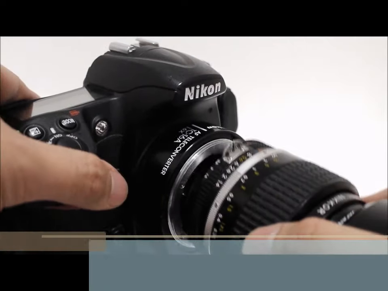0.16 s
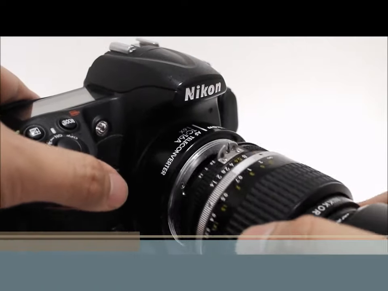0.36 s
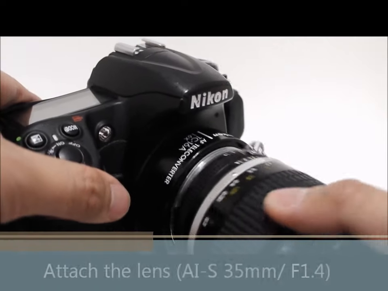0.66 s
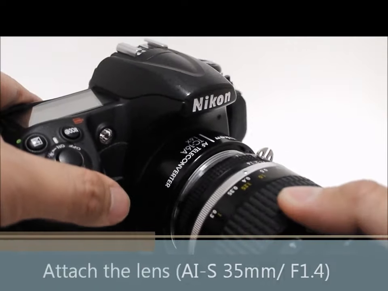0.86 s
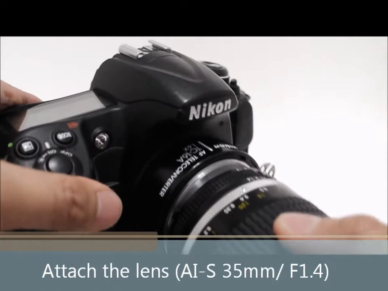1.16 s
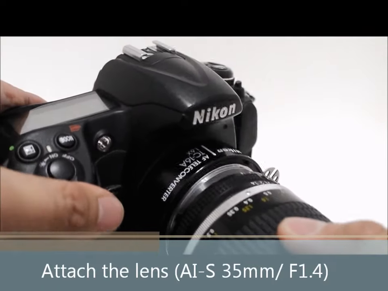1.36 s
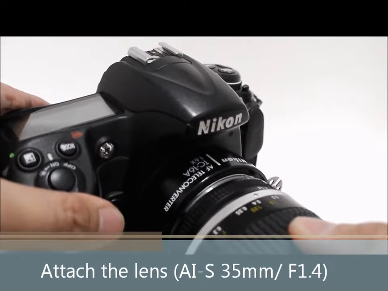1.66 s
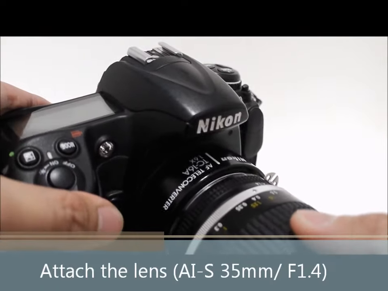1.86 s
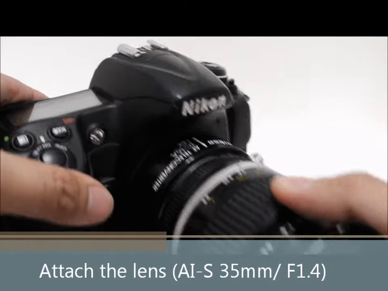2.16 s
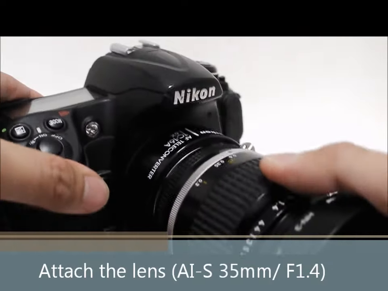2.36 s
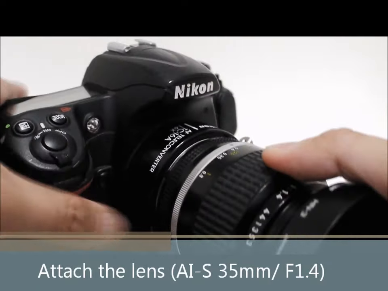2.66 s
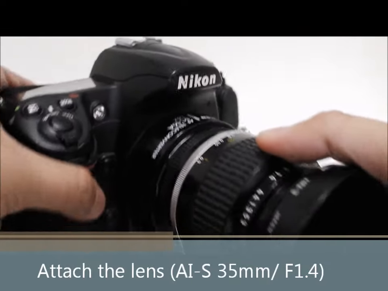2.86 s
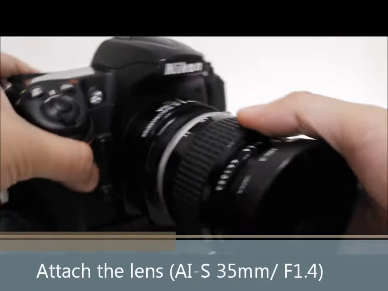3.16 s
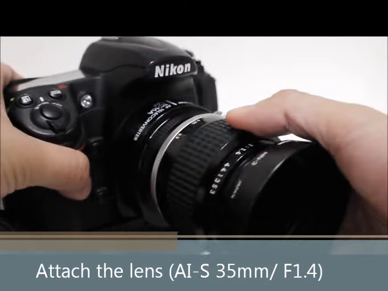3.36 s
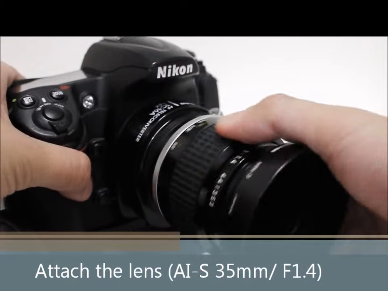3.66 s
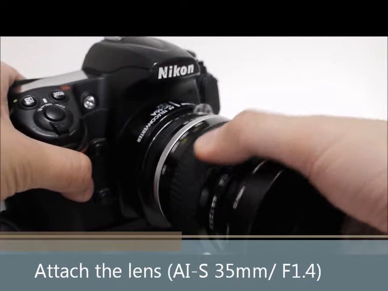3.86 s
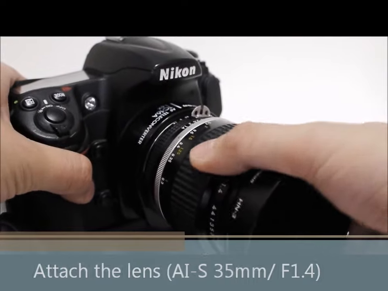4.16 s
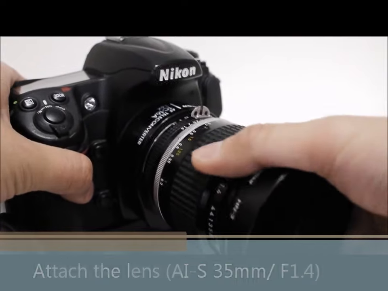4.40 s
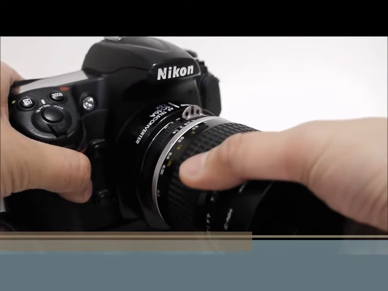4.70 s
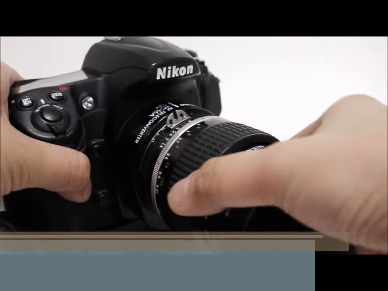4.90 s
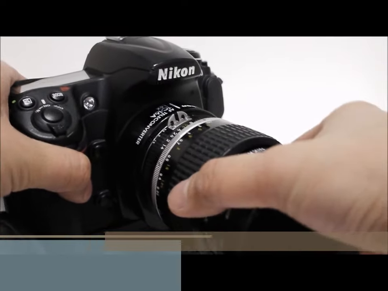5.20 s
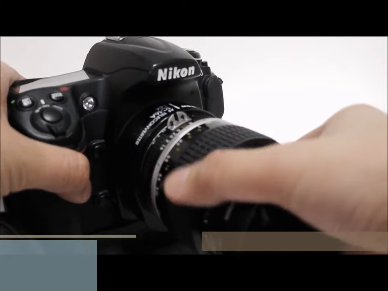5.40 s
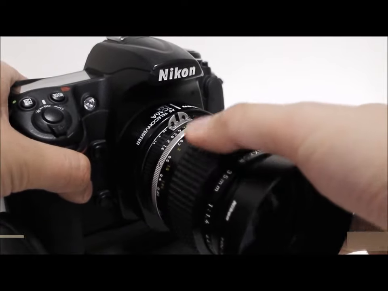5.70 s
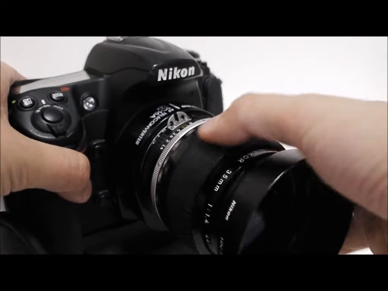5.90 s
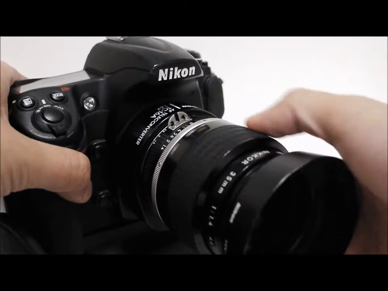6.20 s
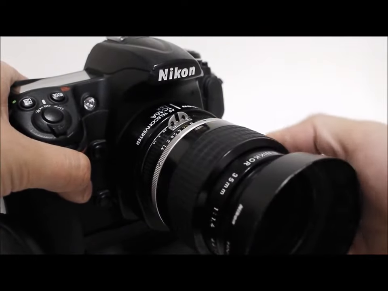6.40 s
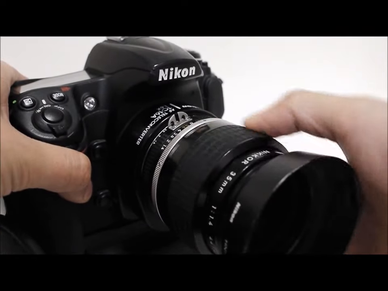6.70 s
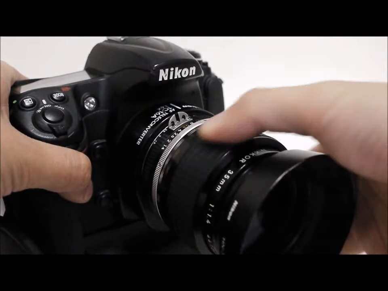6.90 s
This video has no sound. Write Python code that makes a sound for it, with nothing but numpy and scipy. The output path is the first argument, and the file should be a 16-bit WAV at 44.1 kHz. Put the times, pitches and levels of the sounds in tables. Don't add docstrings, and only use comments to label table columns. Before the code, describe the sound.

A lens is handled and mounted on a camera, very close to the microphone in a small, quiet room with a short soft tail and constant light hiss. Quick bright ticks open the scene, then a clack at 0.5 s and a cluster of dull knocks and finger drags until 1.1 s. A double metal clack lands near 1.55 s, a tick at 1.9 s, and a strong, full clack at 2.2 s. Small ticks lead into a gritty twisting scrape from 2.7 to 3.1 s, ending in a knock. Lighter knocks and rubs follow, a click and slide at 3.75 s, a knock at 4.15 s. A scrape builds with ticks into the sharpest, brightest snap at 4.87 s; hiss dips slightly. A dull knock comes at 5.2 s, a tiny tick and faint spring brushing around 5.5 s, then quiet hiss until a hard click at 7 s.

```python
import sys
import numpy as np
from scipy import signal
from scipy.fft import rfft, irfft
from scipy.io import wavfile
from scipy.ndimage import uniform_filter1d

SR = 44100
rng = np.random.default_rng(int(sys.argv[2]) if len(sys.argv) > 2 else 0)


def field_ratio(decibels):
    return 10 ** (np.asarray(decibels, dtype=float) / 20)


def digitize_waveform(pressure):
    field = np.atleast_2d(pressure).T
    bounded = np.clip(field, -1, 1)
    quanta = np.round(bounded * 32767).astype(np.int16)
    wavfile.write(sys.argv[1], SR, quanta)


N = 310905
T = np.arange(N) / SR
SPAN = 8192

# frequency in Hz, level in dB, t60 in s.
RING_MODES = [(3113, 4.5, 0.039), (3370, 12.5, 0.026), (3840, 5, 0.032), (4376, 7.5, 0.024),
              (4860, 5, 0.018), (5150, 3.5, 0.018), (6270, -6.5, 0.018)]
# frequency in Hz, level in dB, t60 in s.
BODY_MODES = [(348, -15, 0.057), (415, 6.5, 0.041), (530, 1, 0.085), (626, -30, 0.029), (745, 1, 0.22),
              (803, -0.5, 0.16), (940, 11.5, 0.032)]
# frequency in Hz, level in dB, t60 in s.
BARREL_MODES = [(1185, 9.5, 0.045), (1440, 0, 0.16), (1700, 15, 0.04), (1968, 5.5, 0.054),
                (2400, -14, 0.086), (2570, -13, 0.23)]
# frequency in Hz, level in dB, t60 in s.
PIN_MODES = [(7020, 0, .011), (7700, -4, .009), (8500, -1, .01), (9640, -3, .01), (10800, -4, .009),
             (11900, -4, .009)]
# lower edge in Hz, upper edge in Hz.
PART_BANDS = [
    (2800, 6500),
    (250, 1100),
    (1100, 2800),
    (6500, 13500),
]
# level in dB against the named modes, rise in ms, t60 in s.
PART_CRACKS = [
    (3, 0.2, 0.038),
    (-2, 2.8, 0.12),
    (6, 1.4, 0.066),
    (26, 0.13, 0.046),
]
# (frequency in Hz, level in dB, t60 in s).
RUBBED_PARTS = [
    (2700, 6200, 3, [(3150, 2, .014), (3650, -3, .009), (6400, -6, .007)]),
    (580, 1100, -3, [(745, 0, .04), (910, -3, .03)]),
    (1100, 2800, 5, [(1550, -2, .025), (2430, 0, .03)]),
    (7000, 14200, 14, [(8800, 0, .006), (11900, -2, .01)]),
]
# frequency in Hz, level in dB, t60 in s.
SPRING_MODES = [(1780, 6, .08), (4050, -1, .1), (8150, -5, .08), (10700, -6, .08), (13600, -9, .08)]

# time in s, level in dB.
HUM_LEVELS = [(0, -77.5), (.06, -73.5), (.58, -75), (.65, -83), (.8, -81), (1.0, -74), (1.07, -82),
              (1.2, -110), (6.5, -110), (6.7, -88), (7.05, -87)]
# frequency in Hz, density in dB per Hz.
HISS_SPECTRUM = [(18, -53), (30, -32), (91, -24.5), (122, -19), (158, -12), (248, -5), (332, -3),
                 (409, -2.5), (713, -0.5), (1530, -4.5), (2050, -7.5), (2470, -9), (13400, -22.5),
                 (15200, -28), (16500, -24)]
# centre in Hz, width in Hz, level in dB.
WHINES = [(13550, 300, -90), (15650, 160, -95)]
# time in s, gain in dB.
HISS_GAIN = [(0, 4), (2.1, 5), (2.3, 2.5), (4.0, 5), (4.87, 4.5), (5.0, 1), (5.8, 3), (7.05, 4.5)]
# band centre in Hz, t60 in s.
ROOM_DECAY = [(300, 0.38), (1500, 0.19), (5000, 0.17), (12000, 0.14)]

# start in s, peak of rings in dB, then barrel and pins in dB against the rings.
TICK_EVENTS = [(.018, -29.5, -25, -2), (.0352, -26.5, -17, 3), (0.058, -43, -3, -14),
               (.1924, -49, -18, -20), (0.538, -42.5, -6, 7.5), (1.7463, -57, -16, 8.5),
               (1.8678, -47.5, -4, 1), (2.433, -44, -2.5, -30), (2.513, -48, -1.5, -3.5),
               (2.5696, -43.5, -4, -2), (2.6061, -53, 9, -6), (2.8, -52, -1, -1), (3.1416, -64, 2, 18),
               (3.5254, -45, -14, -21), (4.21, -42.5, 0.5, -7), (4.712, -58.5, 9.5, 8),
               (4.7599, -37, -17, -1), (4.8195, -34.5, -31, -3), (4.8412, -48, -6, 9),
               (4.8635, -27, -11, 1), (4.8664, -22.5, -15.5, 7.5), (5.1436, -49, -4, -20),
               (5.4777, -51, -3, -9)]
# start in s, peak of body in dB, then barrel and rings in dB against the body.
KNOCK_EVENTS = [(0.381, -39.5, 1, -7.5), (.6065, -39.5, -9, -12), (0.6558, -45, -9, -8),
                (0.7306, -45.5, -6, -7.5), (0.8238, -36, -5.5, -0.5), (0.8791, -39, -0.5, -2),
                (1.0143, -46.5, 5, 3), (1.037, -34, -7, -9.5), (1.135, -41, -11, -5),
                (1.4833, -46.5, -18.5, -14.5), (1.8967, -47.5, -6, -11), (2.502, -50, -6, -13.5),
                (2.6661, -43.5, 3, -12), (3.2768, -41, 0, -6), (4.1554, -34, 1, 3), (4.939, -48.5, 5, -17),
                (5.169, -35.5, 2.5, 0)]
# start in s, peak of rings in dB,
# then body, barrel and pins in dB against the rings.
CLACK_EVENTS = [(.1408, -49.5, -1.5, -13, 1), (.3636, -50.5, 4, -14, -13),
                (0.4617, -29.5, -2.5, -3.5, -6.5), (0.4663, -60, 14, 1, 20), (0.666, -47, -3, -5, -4),
                (1.5375, -38, -6, -0.5, -1), (1.546, -36.5, -0.5, -3, -15), (1.5742, -28, -0.2, -4.5, 2),
                (1.5845, -24.5, -9.5, -1.5, -4.5), (2.168, -24, -4, 0.8, 3.5), (2.7687, -48.5, 1, -6, -1),
                (3.1335, -38, -12, -2, -2), (3.4055, -48, -11, -17, -14), (3.7395, -31, -10.5, -3, -5.5),
                (6.979, -21.5, -15, -11.5, -1)]

# start in s, strongest in s, end in s, level in dB, brightness in dB.
DRAG_STROKES = [(.19, .23, 0.29, -68, -8), (0.48, 0.495, .51, -69, 8), (0.52, 0.539, 0.55, -51.5, -5),
                (0.613, 0.62, 0.66, -57.5, -8), (0.642, 0.656, 0.7, -46.5, -1), (.67, 0.74, 0.85, -57, -4),
                (0.885, 0.92, 0.79, -62, 2), (.93, 1.03, 1.02, -57.5, 5), (1.543, 1.555, 1.59, -45.5, 2),
                (1.783, 1.795, 1.88, -63, -4), (1.79, 1.86, 1.8, -65, 10.5), (2.127, 2.154, 2.37, -59.5, 9),
                (2.163, 2.167, 2.17, -40.5, 9), (2.59, 2.614, 2.645, -53, -15),
                (3.145, 3.17, 3.17, -52, -10), (3.18, 3.2, 3.28, -54.5, -1), (3.27, 3.287, 3.4, -65, 2),
                (3.373, 3.415, 3.26, -63.5, -2), (3.537, 3.52, 3.7, -60.5, -3), (4.933, 4.92, 5.0, -55, 8)]
# start in s, strongest in s, end in s, level in dB, brightness in dB.
SCRAPE_STROKES = [(.138, 0.153, 0.18, -61.5, -1), (0.177, 0.2, 0.17, -73, 11.5),
                  (0.49, 0.548, .565, -57, 1), (.53, 0.569, 0.6, -62.5, 16),
                  (2.557, 2.581, 2.73, -65.5, -1), (3.165, 3.183, 3.12, -68, 4),
                  (3.533, 3.538, 3.7, -75, 2), (3.629, 3.716, 3.82, -64.5, -0.5),
                  (3.743, 3.856, 3.89, -56, -1.5), (2.848, 2.89, 2.83, -65, -6),
                  (4.205, 4.292, 4.325, -63.5, -6), (4.43, 4.452, 4.58, -65, -2),
                  (4.648, 4.86, 4.92, -55.5, -1.5), (1.542, 1.547, 1.51, -54, -5),
                  (4.133, 4.154, 4.165, -67, .1), (5.14, 5.167, 5.05, -68, -7)]
# time in s, pressure in dB, brightness in dB.
BAYONET_TWIST = [(2.7, -67, -1), (2.778, -56, -1), (2.852, -53.5, 0.5), (2.896, -45.5, 2.5),
                 (2.946, -53, 2.6), (3.0, -50, 0.5), (3.066, -49, 0.1), (3.098, -50.5, 0.5),
                 (3.124, -50, -4)]
# gains of rings, body, barrel, pins in dB, their shares of the brightness, stroke exponent.
DRAG_KIND = (-12, -0.5, -10.5, -17.5), (1, 0, 0, 1), 1.3
# gains of the four parts in dB, their shares of the brightness, stroke exponent.
SCRAPE_KIND = (0.5, -14, -4.5, -3.5), (0, 0, 0, 1), 0.6
# gains of the four parts in dB, their shares of the brightness.
TURN_KIND = (-6, -5, -5, -14), (1.55, 0.5, 0, 1.5)
# start in s, strongest in s, end in s, level in dB.
SPRING_BRUSHES = [(4.2, 4.26, 4.33, -71), (5.515, 5.53, 5.565, -69), (5.585, 5.615, 5.66, -70.5),
                  (5.73, 5.75, 5.78, -74)]

# start in s, frequency in Hz, peak in dB.
ACCENT_EVENTS = [(.463, 743, -33.5), (.666, 758, -37.5), (.826, 745, -40.5), (1.579, 153, -58),
                 (1.586, 739, -34), (2.168, 150, -47.5), (2.169, 415, -36), (2.169, 800, -31),
                 (2.17, 530, -36), (3.134, 708, -37), (3.278, 776, -52.5), (4.155, 950, -37),
                 (4.156, 193, -57), (4.157, 398, -46), (4.87, 792, -40.5), (4.872, 268, -50.5),
                 (4.941, 990, -47), (5.169, 421, -49.5), (5.17, 980, -47), (5.172, 151, -62.5),
                 (6.982, 269.1, -50.5), (6.985, 487, -46),
                 (.036, 4830, -48), (1.587, 5940, -27), (1.867, 6100, -41), (2.168, 10860, -25.5),
               (2.169, 1120, -35), (2.169, 6600, -25.5), (2.569, 3330, -40.5), (3.74, 6120, -37),
               (4.158, 1751, -34), (4.21, 3850, -40.5), (4.211, 1850, -40), (4.759, 3340, -39.5),
               (4.82, 4620, -34), (4.867, 1430, -34.5), (4.867, 4600, -20), (5.168, 1810, -38.5),
               (5.169, 1080, -48), (4.942, 2860, -45), (5.477, 3640, -46), (5.476, 1774, -54),
               (6.9794, 3580, -32), (6.9793, 2810, -27), (6.979, 8500, -30)]
# start in s, frequency in Hz, peak in dB, t60 in ms.
TAP_EVENTS = [(.002, 5000, -52, 8), (.0354, 8700, -25, 10), (0.0355, 2840, -30.5, 22),
              (0.0364, 3460, -28, 26), (.0362, 1680, -38, 22), (.036, 10000, -28, 11),
              (0.0197, 3400, -36, 20), (.0195, 7350, -34, 14), (.048, 9000, -42, 10),
              (.0578, 4500, -42, 10), (0.018, 4840, -36, 14), (.4625, 2700, -36.5, 12),
              (.4625, 4100, -36, 10), (.54, 2800, -45, 14), (.5415, 4500, -44, 12), (1.0145, 3900, -42, 10),
              (1.0405, 1110, -35, 14), (1.5478, 3570, -36, 10), (1.5865, 1160, -31, 14),
              (1.5875, 1810, -32, 14), (1.596, 950, -37, 18), (2.162, 3300, -42, 12),
              (2.1688, 1690, -18, 22), (2.1695, 1980, -23, 30), (2.1715, 432, -30, 60),
              (2.174, 950, -29, 25), (2.17, 2580, -28, 28), (3.134, 1480, -35.5, 25),
              (3.282, 1150, -45, 30), (4.8667, 6200, -16, 14), (4.8666, 14000, -18, 7),
              (4.8666, 8640, -21, 8), (4.8666, 11500, -24, 7), (4.945, 1000, -52, 14),
              (6.9805, 780, -28.5, 30), (6.979, 4750, -27, 10), (6.9795, 3160, -28, 28),
              (6.98, 5400, -29, 12), (5.477, 4500, -51, 14), (5.478, 1800, -54, 30), (6.98, 1760, -34, 32),
              (6.9793, 7100, -32, 12), (2.169, 1440, -24, 30), (3.277, 3400, -43, 16),
              (3.277, 4300, -47, 12), (2.667, 3800, -48, 12), (.6555, 800, -41, 25), (3.134, 4900, -44, 10)]
# start in s, strongest in s, end in s, level
# in dB, centre in Hz.
SCUFF_STROKES = [(0, 0.007, .03, -69, 150), (.13, .152, 0.2, -62, 200), (.35, .385, 0.46, -61, 240),
                 (.52, .55, 0.64, -63, 230), (1.03, 1.055, 1.06, -63, 260), (1.47, 1.49, 1.52, -68.5, 170),
                 (1.53, 1.56, 1.6, -59, 200), (1.86, 1.89, 1.93, -66, 201), (2.17, 2.19, 2.26, -54.5, 200),
                 (3.18, 3.2, 3.23, -58, 350), (3.275, 3.29, 3.3, -63, 300), (3.385, 3.42, 3.47, -60, 280),
                 (3.55, 3.58, 3.62, -66.5, 280), (3.65, 3.68, 3.74, -66, 250), (3.74, 3.76, 3.76, -64, 260),
                 (5.17, 5.18, 5.35, -65, 230), (6.982, 6.99, 7.04, -54, 480), (6.983, 6.99, 7, -53, 3400),
                 (2.172, 2.174, 2.25, -48.5, 1400), (4.927, 4.943, 5.02, -55, 2300),
                 (3.13, 3.15, 3.2, -72, 170), (3.02, 3.062, 3.09, -57, 760), (3.76, 3.84, 3.89, -61, 2500),
                 (4.15, 4.167, 4.22, -69, 160), (.53, .56, .6, -76, 90)]


def level(x, db):
    return x * field_ratio(db) / np.sqrt(np.mean(x ** 2))


def peak(x):
    return x / np.max(np.abs(x))


def band(x, lo_hz, hi_hz):
    return signal.sosfilt(signal.butter(3, [lo_hz, hi_hz], "bandpass", fs=SR, output="sos"), x)


def highpass(x, order, hz):
    return signal.sosfilt(signal.butter(order, hz, "highpass", fs=SR, output="sos"), x)


def curve(rows):
    return np.interp(T, *np.transpose(rows))


def walk(rate_hz):
    hold = int(SR / rate_hz)
    steps = np.repeat(rng.standard_normal(N // hold + 1), hold)
    return 1.68 * uniform_filter1d(steps, hold)[:N]


def decay(t, t60):
    return np.exp(-np.log(1000) * t / t60)


def stroke(start, top, end, pointed):
    corners = [min(start, top - 0.008), top, max(end, top + 0.012)]
    return np.interp(T, corners, [0, 1, 0]) ** pointed


def ring(modes, strike=None, scatter_db=0, detune=0):
    hz, db, t60 = np.transpose(modes)[:, :, None]
    if strike is None:
        strike = np.zeros((2, len(modes)))
    strength, shift = strike[:, :len(modes), None]
    t = T[:int(min(t60.max() * SR, SPAN))]
    fading = field_ratio(db + scatter_db * strength) * decay(t, t60)
    response = np.sum(fading * np.sin(2 * np.pi * hz * (1 + detune * shift) * t), axis=0)
    return np.pad(response, (0, SPAN - len(t)))


def hiss():
    hz, db = np.transpose(HISS_SPECTRUM)
    f = np.maximum(np.arange(N // 2 + 1) * SR / N, 1)
    shape = field_ratio(np.interp(np.log(f), np.log(hz), db))
    noise = level(irfft(rfft(rng.standard_normal(N)) * shape, N), -65.5)
    for centre, width, db in WHINES:
        whine = band(rng.standard_normal(N), centre - width / 2, centre + width / 2)
        noise = noise + field_ratio(1.9 * walk(15)) * level(whine, db)
    return field_ratio(curve(HISS_GAIN) + 0.3 * walk(5)) * noise


def hum():
    return np.sqrt(2) * field_ratio(curve(HUM_LEVELS) + 2.7 * walk(14)) * np.sin(2 * np.pi * 145 * T)


def room(x):
    t = T[:2 * SPAN]
    tail = np.zeros(2 * SPAN)
    for hz, t60 in ROOM_DECAY:
        noise = band(rng.standard_normal(2 * SPAN), hz / 1.76, min(hz * 1.46, 16000))
        tail += level(noise, 10 * np.log10(hz)) * decay(t, t60)
    tail *= np.clip(t / 0.015, 0, 1)
    return field_ratio(-11.5) * signal.fftconvolve(x, tail / np.sqrt(np.sum(tail ** 2)))[:N]


def scuffs():
    grit = rng.standard_normal(N) * field_ratio(2.1 * walk(70))
    out = np.zeros(N)
    for *times, db, hz in SCUFF_STROKES:
        out += field_ratio(db) * stroke(*times, 0.77) * level(band(grit, hz / 1.51, hz * 1.62), 0)
    return out


def spring():
    lines = signal.fftconvolve(rng.standard_normal(N), ring(SPRING_MODES))[:N]
    return level(lines, 0) * sum(field_ratio(db) * stroke(*times, 0.2) for *times, db in SPRING_BRUSHES)


def part_gains(kind, db, bright):
    part_db, bright_share = np.array(kind[0])[:, None], np.array(kind[1])[:, None]
    return field_ratio(db + part_db + bright_share * bright)


def pressure():
    s, db, bright = np.transpose(BAYONET_TWIST)
    turning = np.array([np.interp(T, s, gain) for gain in part_gains(TURN_KIND, db, bright)])
    out = turning * np.clip(np.minimum(T - s[0], s[-1] + 0.012 - T) / 0.012, 0, 1)
    for kind, rows in ((DRAG_KIND, DRAG_STROKES), (SCRAPE_KIND, SCRAPE_STROKES)):
        for *times, db, bright in rows:
            span = slice(int((min(times) - 0.01) * SR), int((max(times) + 0.012) * SR))
            out[:, span] += part_gains(kind, db, bright) * stroke(*times, kind[2])[span]
    return out


def rubs():
    grit = rng.standard_normal(N) * field_ratio(1.6 * rng.exponential(size=N) + 1.5 * walk(60))
    out = np.zeros(N)
    for (lo_hz, hi_hz, grit_db, modes), gain in zip(RUBBED_PARTS, pressure()):
        modal = signal.fftconvolve(grit, ring(modes))[:N]
        modal = level(band(modal, lo_hz * 0.84, hi_hz * 1.15), 0)
        rough = level(band(grit[::-1], lo_hz, hi_hz), grit_db)
        out += gain * level(modal + rough, 0)
    return out


def accents():
    out = np.zeros(N + SPAN)
    for s, hz, db, *held_ms in sorted(ACCENT_EVENTS) + TAP_EVENTS:
        if held_ms:
            t60 = held_ms[0] / 1000
        else:
            t60 = (0.075 if hz < 1000 else 0.064) * (1000 / hz) ** 0.63
        push = rng.standard_normal(SPAN // 64) * np.exp(-T[:SPAN // 64] / 0.0008)
        cluster = [(hz, 0, t60), (hz * 1.035, -5, t60 * 0.95), (hz * 0.88, -7, t60 * 0.54)]
        rung = signal.fftconvolve(push, ring(cluster))[:SPAN]
        rung = highpass(rung, 3, max(hz / 2, 125))
        out[int(s * SR):][:SPAN] += field_ratio(db) * peak(rung)
    return out[:N]


def contacts():
    rows = []
    for s, db, barrel, pins in TICK_EVENTS:
        rows.append((s, db, db - 26, db + barrel, db + pins, 2.1))
    for s, db, barrel, rings in KNOCK_EVENTS:
        rows.append((s, db + rings, db, db + barrel, db + rings - 12.5, 2.16))
    for s, db, body, barrel, pins in CLACK_EVENTS:
        rows.append((s, db, db + body, db + barrel, db + pins, 3.4))
    return sorted(rows)


def clicks():
    out, t = np.zeros((2, N + SPAN)), T[:SPAN]
    parts = (RING_MODES, BODY_MODES, BARREL_MODES, PIN_MODES)
    for s, *part_db, rattle_ms in contacts():
        noise, bounce = rng.standard_normal(SPAN), rng.exponential(size=SPAN)
        fade = np.exp(-t / (rattle_ms / 1000))
        push = (noise * field_ratio(4.37 * bounce) * fade)[:SPAN // 4]
        for modes, edges, (crack_db, rise_ms, t60), db in zip(parts, PART_BANDS, PART_CRACKS, part_db):
            response = ring(modes, rng.standard_normal((2, 10)), 2.5, 0.02)
            modal = signal.fftconvolve(push, response)[:SPAN]
            swell = (1 - np.exp(-t * 1000 / rise_ms)) * (fade + 0.5 * decay(t, t60))
            crack = field_ratio(crack_db) * peak(band(noise * swell, *edges))
            both = np.array([peak(modal), crack])
            out[:, int(s * SR):][:, :SPAN] += field_ratio(db - 1.5) * both / np.max(np.abs(both.sum(axis=0)))
    return out[:, :N]


def scene():
    modes, crack = clicks()
    broad, strong = crack + rubs(), accents()
    to_walls = broad + field_ratio(-7) * (modes + strong)
    small = highpass(modes + broad + spring() + room(to_walls), 4, 240)
    return (small + strong + hum() + hiss() + scuffs())[None]


def roll_off(x):
    return signal.sosfilt(signal.butter(12, 16650, fs=SR, output="sos"), x)


def record(dry):
    cut = signal.sosfilt(signal.ellip(8, 0.2, 50, 15800, fs=SR, output="sos"), dry)
    return roll_off(cut)


dry = scene()
out = record(dry)
digitize_waveform(out)
```